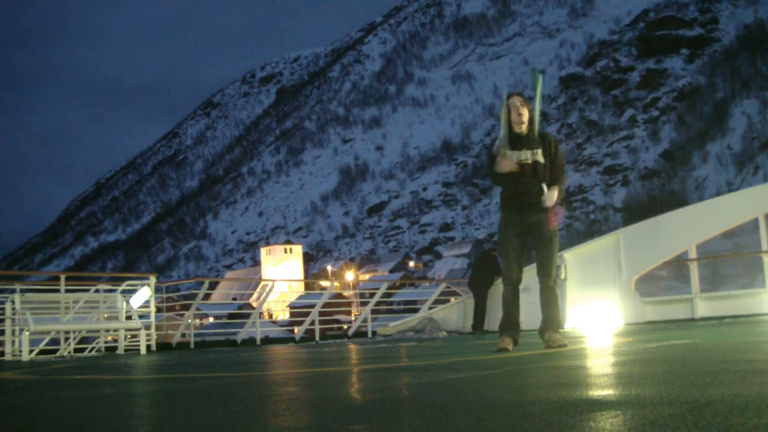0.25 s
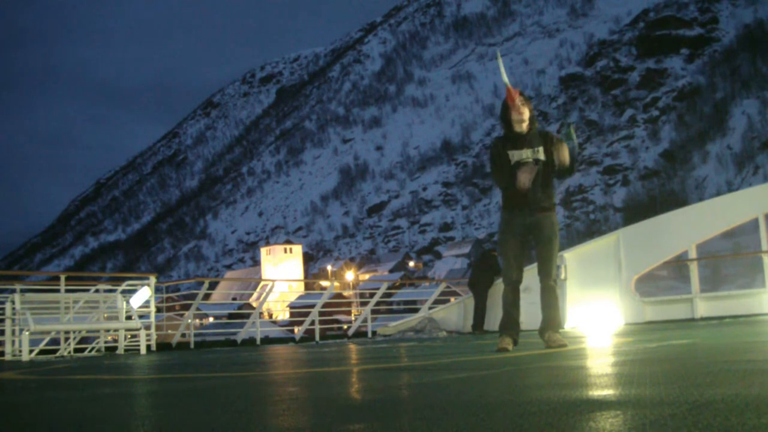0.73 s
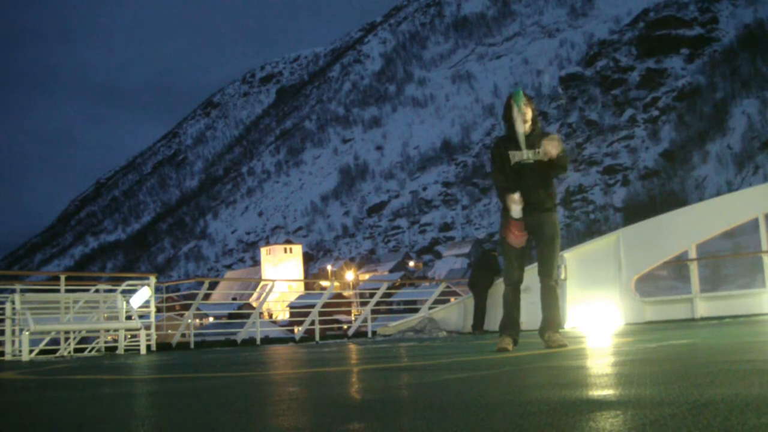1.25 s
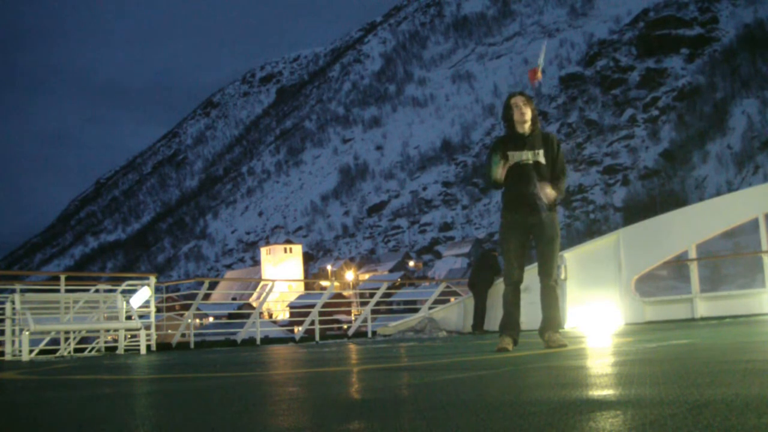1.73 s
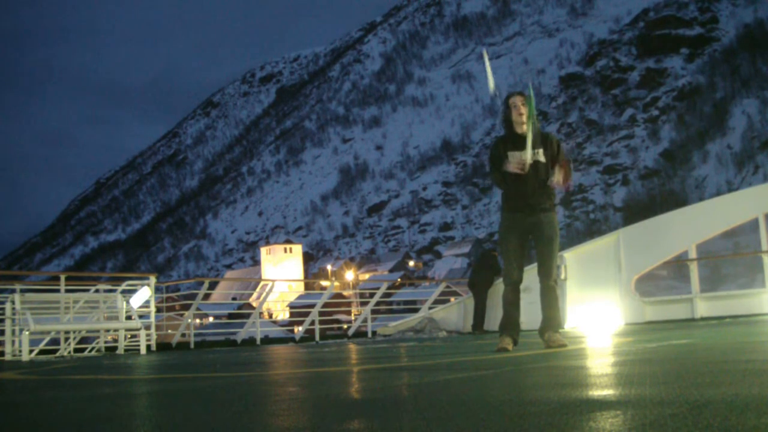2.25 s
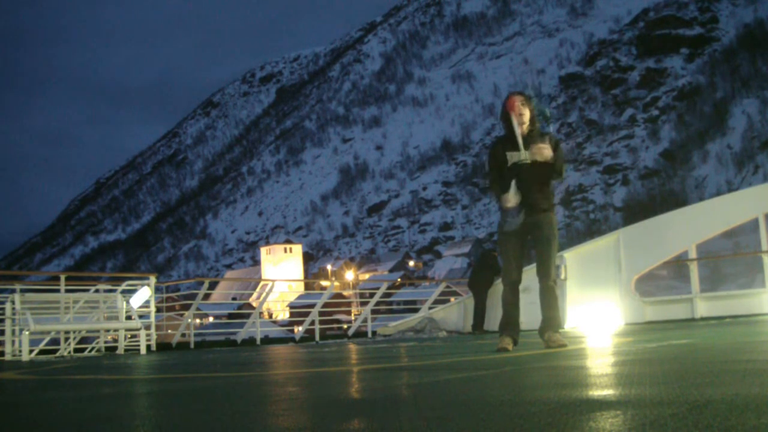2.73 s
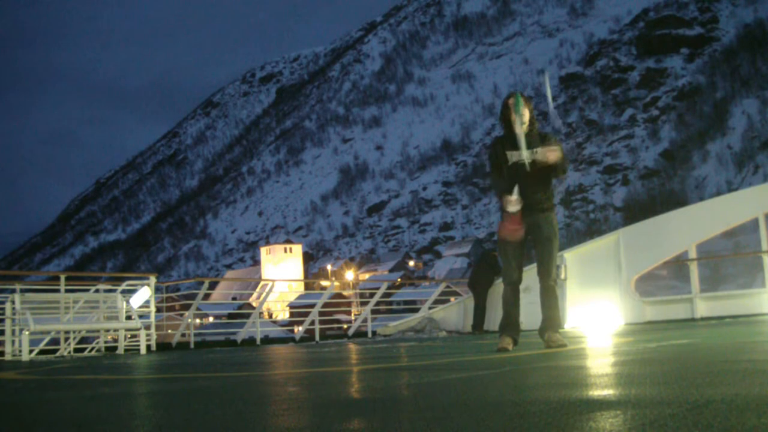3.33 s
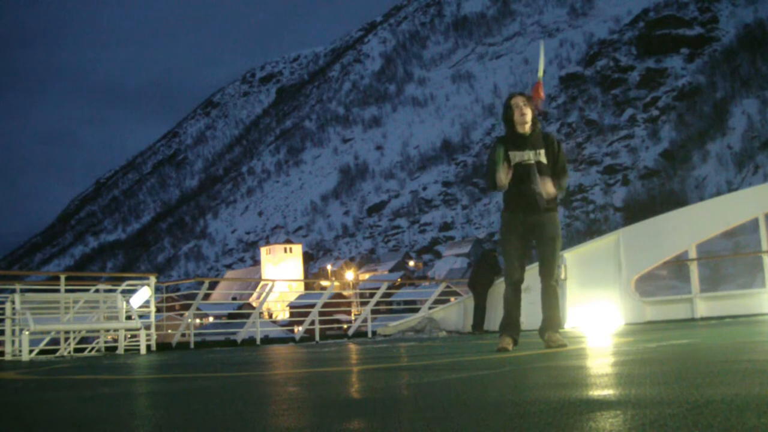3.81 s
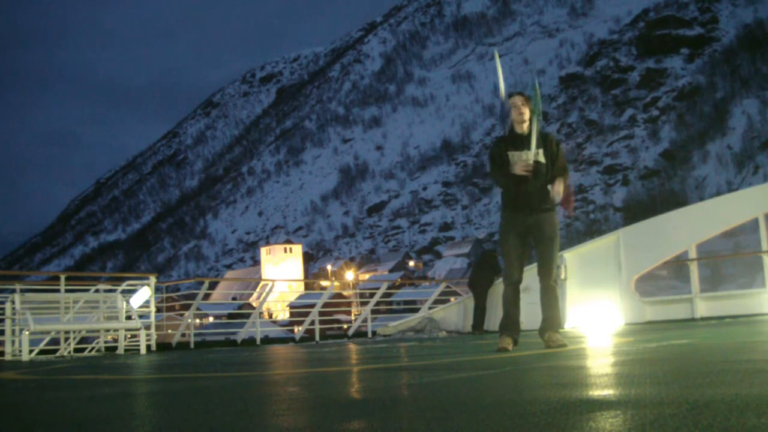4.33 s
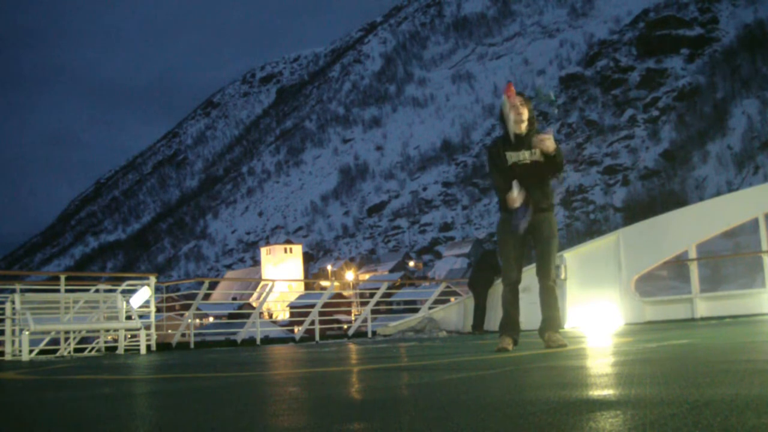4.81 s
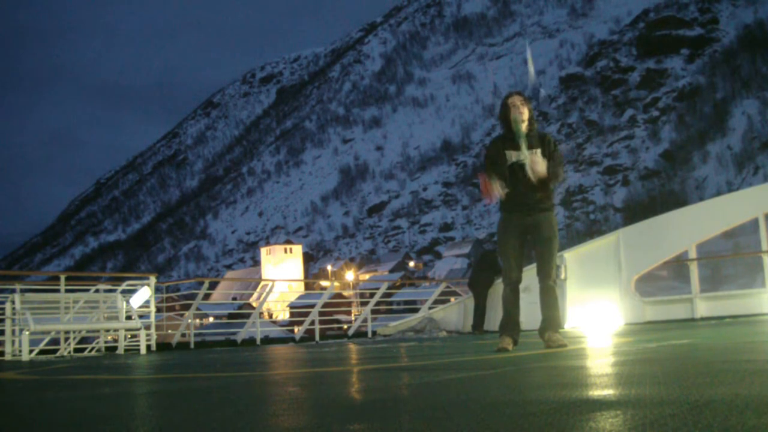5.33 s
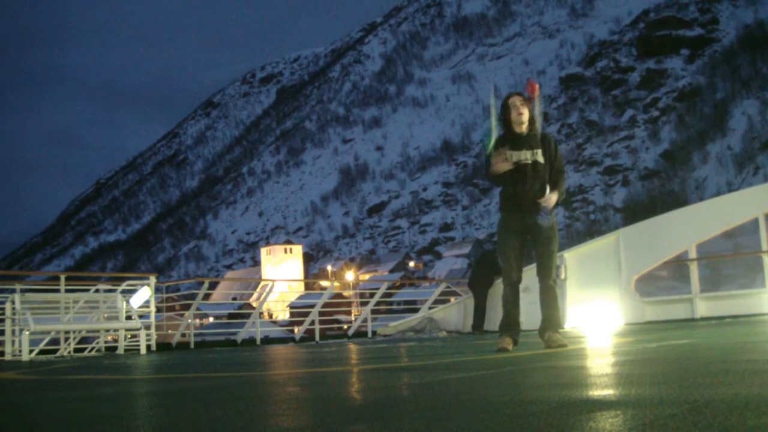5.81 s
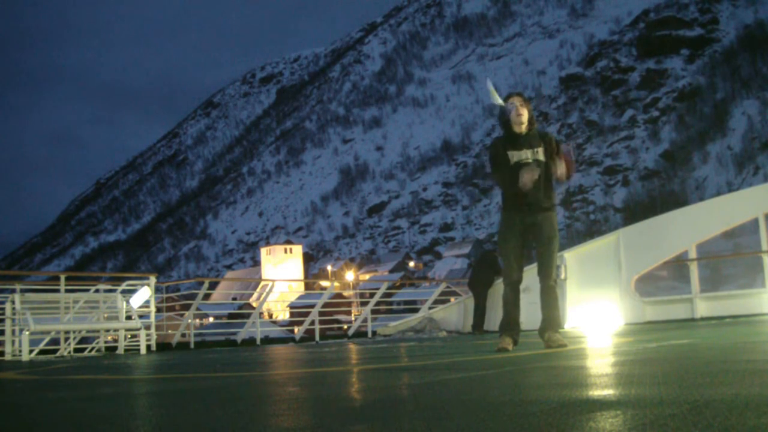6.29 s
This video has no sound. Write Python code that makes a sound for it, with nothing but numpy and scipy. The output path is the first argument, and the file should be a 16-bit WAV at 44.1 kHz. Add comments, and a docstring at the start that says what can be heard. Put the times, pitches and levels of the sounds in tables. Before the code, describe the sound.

Two ship engines drone low and throb steadily on an open deck while juggling clubs softly slap into hands, with two brief plastic clacks.

```python
"""On the open deck of a ship, two diesel engines drone at almost the same speed.
Each engine is a stack of exhaust notes, and the two stacks beat slowly against each other.
Filtered noise makes a low rumble, and a rushing roar with a hollow hum that throbs once per engine cycle.
In front, a juggler's clubs brush into the hands two or three times a second (soft bursts of noise).
Twice the clubs clack together: short knocks of noise with quickly fading rings."""
import sys
import numpy as np
from scipy import signal
from scipy.fft import rfft, irfft, next_fast_len
from scipy.io import wavfile
from scipy.ndimage import uniform_filter1d, map_coordinates

SR = 44100
rng = np.random.default_rng(int(sys.argv[2]) if len(sys.argv) > 2 else 0)


def waveform_to_disk(signal):
    """Save audio, clipped to [-1, 1], as 16-bit WAV at the path in sys.argv[1]."""
    frames = np.transpose(np.atleast_2d(signal))
    scaled = np.clip(frames, -1, 1) * 32767
    samples = np.round(scaled).astype(np.int16)
    wavfile.write(sys.argv[1], SR, samples)


N = 288855
TIME = np.arange(N) / SR  # seconds

# Rumble under the exhaust notes, relative colour: f/Hz, level/(dB per Hz)
RUMBLE_COLOUR = [(14, -8), (30, 3.5), (55, -4), (80, 5), (108, 1.5), (135, -4.5), (200, -22), (400, -57.5)]
# Colour of the roar, relative: f/Hz, level/(dB per Hz)
ROAR_COLOUR = [(130, -1.5), (175, -2.5), (230, -8), (310, -11.5), (450, -8.5), (650, -19.5), (900, -23),
               (1250, -27), (1850, -29), (2550, -29.5), (3500, -37.5), (4600, -38), (5500, -41.5),
               (6800, -42), (9000, -47.5), (15000, -54)]
# Hollow hum of the funnel: f/Hz, width/Hz (half that of each of two filters in a row),
# level/dB, share of the gas flow's swing (no unit)
FUNNEL_HUMS = [(164.5, 22.4, -39, 0.62), (211, 40, -49, 1.8), (289.8, 7.2, -43.5, 0.8),
               (304, 66, -46.5, 2.34), (410.8, 26.2, -35, 1.2), (447, 30.6, -39, 1), (631, 19.5, -47, 0.8),
               (869, 52, -50.5, 1.4)]
# How strongly the roar throbs with each engine cycle: t/s, depth/dB (up and down from the middle)
THROB_DEPTH_POINTS = [(0, 3), (.53, 3.5), (.71, 1), (1.42, 1.5), (2.66, 2.5), (3.36, 0.3), (3.54, 3),
                      (5.13, 0), (5.66, 3.5), (6.55, 2)]
# Heavy chuffs and short thumps of exhaust: t/s, extra roar level/dB,
# extra hum level/dB (before each hum's share), nominal half length/s
EXHAUST_CHUFFS = [(0.106, 5.5, 2, 0.038), (0.302, 3.6, 5.2, 0.03), (0.345, 7, 12, 0.0021),
                  (0.449, 5, 1, 0.0057), (0.486, 1, 1, 0.043), (0.505, 3.5, 5, .003),
                  (.65, 1.5, -2, 0.0049), (0.849, 2, 6, 0.0072), (1.181, 3, -5, .003),
                  (1.872, 2, -3, 0.013), (2.044, 3, -3, 0.0045), (2.095, 3.5, 4, 0.016),
                  (2.14, 3, 1, 0.0036), (2.197, 3, 6.5, 0.017), (2.394, 0, 5, .003), (2.983, 4.5, 6, 0.012),
                  (3.153, 3.2, 3, 0.018), (3.318, 1.5, 2, 0.017), (3.66, 2.5, 7, 0.022),
                  (3.688, 3.5, 8.5, 0.003), (4.006, 4, 4.5, 0.021), (4.035, 1.5, 1, .003),
                  (5.09, 2, 1, 0.047), (5.436, 2.5, 1, 0.033), (5.615, 2.5, 3, 0.016), (5.775, 2, 6, 0.018),
                  (6.136, 3.3, 2, 0.018)]
# Exhaust notes, relative levels: multiple of the cycle rate (no unit), port level/dB, starboard level/dB
EXHAUST_ORDERS = [(2, -69, -37), (3, -25, -27), (4, -47, -43), (5, -46, -35), (6, -26, -24), (7, -29, -36),
                  (8, -37, -33), (9, -32, -19), (10, -32, -33), (11, -29, -34), (12, -26, -37),
                  (13, -36, -30), (14, -23.5, -23), (15, -34, -43), (16, -39, -43), (17, -29, -40),
                  (18, -23, -41), (19, -38, -49), (20, -39, -49), (21, -31, -37), (22, -44, -57),
                  (24, -40, -40), (25, -44, -47), (26, -44, -50), (27, -45, -36), (28, -49, -44),
                  (29, -36, -35), (30, -42, -50), (32, -40, -49)]
# Slow beats between the engines: multiple of the cycle rate (no unit) -> t/s at which that note swells
BEAT_SWELLS = {3: 5.02, 6: 1.61, 7: .1, 9: .33, 11: 2.4, 12: 1.25, 13: 1.6, 14: .52, 17: 1.35, 18: 1.4, 21:
               1.6, 29: .6}
# Booms of the exhaust pipe: t/s, level/dB (rms, before the overall level of the notes)
PIPE_BOOMS = [(.142, -13.5), (.329, -15.5), (.516, -28), (.665, -18), (.85, -18.5), (1.024, -27),
              (1.118, -29), (1.372, -24.5), (1.578, -20), (1.747, -17.5), (1.87, -22.5), (2.022, -22),
              (2.266, -17), (2.431, -20.5), (2.611, -21), (2.803, -21.5), (2.983, -25), (3.145, -23),
              (3.312, -18.5), (3.401, -24), (3.494, -20), (3.643, -17), (3.982, -32), (4.367, -20.5),
              (4.719, -25), (4.959, -23), (5.287, -20), (5.426, -19), (5.602, -25), (5.763, -26),
              (5.938, -22), (6.142, -21.5), (6.306, -23), (6.488, -20.5)]
# Likeness of left and right: f/Hz, correlation (no unit)
STEREO_LIKENESS = [(100, 0.98), (500, 0.99), (1000, 0.96), (2000, 0.91), (4000, 0.74), (8000, 0.27),
                   (14000, 0.074)]
# Club handles landing in a hand: t/s, peak level/dB, length/s (from peak until power falls to 1/e)
HAND_CATCHES = [(.275, -39.5, 0.014), (.643, -37.5, 0.0066), (.993, -38, 0.0062), (1.13, -47, 0.0054),
                (1.595, -47, 0.0064), (1.70, -40, 0.0061), (2.085, -37.5, 0.0088), (2.41, -45, 0.014),
                (2.75, -38.5, 0.012), (3.11, -44, 0.0087), (3.82, -47, 0.013), (4.087, -40.5, 0.014),
                (4.85, -42.5, 0.012), (5.2, -42, 0.015), (5.49, -42.5, 0.0076), (5.905, -37, 0.0094)]
# Colour of a handle brushing a palm, relative: f/Hz, level/(dB per Hz)
BRUSH_COLOUR = [(1500, 20), (4000, 10.5), (6200, 14.5), (8000, 10), (10000, 10), (15000, 2)]
# Clubs knocking together: t/s, knock level/dB, contact length/s,
# strike on the body/dB, strike on the handle/dB
CLUB_CLACKS = [(1.3398, -26, .0005, -33, -27), (1.3418, -23, .0007, -26.5, -24),
               (1.3505, -37, .003, -39, -44), (3.7813, -19.3, .0005, -22.5, -30),
               (3.7865, -36, .0012, -42, -44)]
# Colour of the plastic knock, relative: f/Hz, level/(dB per Hz)
PLASTIC_COLOUR = [(700, 3), (3100, 4), (4500, -2), (6400, -3), (8200, -1), (14000, -4)]
# Rings of the hollow club body: f/Hz, level/dB (relative to the strike), time to fall 60 dB/s
BODY_MODES = [(1120, -7, .07), (1650, -12, .03), (2400, -2, .016), (2900, 0, .01), (3420, -8, .018),
              (4300, -9, .012)]
# Rings of the stiff club handle: f/Hz, level/dB (relative to the strike), time to fall 60 dB/s
HANDLE_MODES = [(6400, 0, .008), (7500, -5, .006), (9500, -5, .006)]
# Thin fizz that rides on the sound: f/Hz, level/dB (relative to the sound)
FIZZ_BANDS = [(4800, -48), (7200, -49), (9650, -52), (12050, -54.5), (14350, -57)]

PORT_HZ, STARBOARD_HZ = 5.666, 5.702  # average engine cycles per second (four-stroke)
FIRST_THROB_S = .136
SWELL_HZ, FIRST_SWELL_S, SWELL_DB = .59, .25, .53  # slow rise and fall of the gas flow
FLOW_DB, FLOW_SAG_DB_PER_S = .17, .11  # the flow's starting offset and its steady fall
SHUDDER_HZ, FIRST_SHUDDER_S, SHUDDER_DB = 10.93, .03, .97  # a quicker shake across the throb
CHUFF_RISE = 1.02  # a bell builds this much slower, and ends this much faster, than its half length
BOOM_HALF_S, PIPE_DB = .027, -30.5  # half length of a boom; level of the upper notes between booms
CUTOFF_HZ = 14850


def from_db(db):
    """Turn decibels into a gain."""
    return 10 ** (np.asarray(db) / 20)


def rms_one(x):
    """Scale a sound to an average power of 1."""
    return x / np.sqrt(np.mean(x ** 2) + 1e-20)


def at_hz(points, hz):
    """Read a table between its points, with pitch on a log scale."""
    known_hz, values = np.transpose(points)
    return np.interp(np.log(hz + 1), np.log(known_hz), values)


def drift(rate):
    """Smooth random wandering with spread of about 1, through `rate` random points a second."""
    points = rng.standard_normal(2048)
    position = TIME[::64] * rate + 10
    return map_coordinates(points, [position], order=3, mode="mirror").repeat(64)[:N]


def wave(hz, crest_s):
    """A steady rise and fall of height 1 with a crest at the given time."""
    return np.cos(2 * np.pi * hz * (TIME - crest_s))


def chuff(s, half_s):
    """A bell of height 1 that builds a little slower than it ends."""
    width = half_s * np.where(TIME < s, CHUFF_RISE, 1 / CHUFF_RISE)
    return np.exp(-np.minimum(((TIME - s) / width) ** 2, 50))


def steadied(x, share, window_s=.018):
    """Even out a share of a sound's own slow swells, then scale it to rms 1."""
    power = np.mean(np.atleast_2d(x) ** 2, axis=0)
    size = int(window_s * SR)
    for _ in range(2):
        power = uniform_filter1d(power, size)
    return rms_one(x / (np.abs(power) + 1e-6) ** (share / 2))


def resonate(x, hz, width_hz):
    """One resonance lets through sound near its own pitch, with gain 1 at the top."""
    r = np.exp(-np.pi * width_hz / SR)
    top = np.array([1, 0, -1]) * (1 - r * r) / 2
    return signal.lfilter(top, [1, -2 * r * np.cos(2 * np.pi * hz / SR), r * r], x)


def resonate_twice(x, hz, width_hz):
    """Two equal resonances in a row give a band with steeper sides."""
    return resonate(resonate(x, hz, width_hz), hz, width_hz)


def stereo_noise(colour):
    """Coloured noise of rms 1, alike in both ears in the bass and wider in the treble."""
    size = next_fast_len(N)
    hz = np.arange(size // 2 + 1) * SR / size
    mid, side = rfft(rng.standard_normal((2, size)))
    alike = np.clip(at_hz(STEREO_LIKENESS, hz), 0, 1)
    both = np.sqrt(1 + alike) * mid + np.sqrt(1 - alike) * side * [[1], [-1]]
    low_edge = 1 - np.exp(-(hz / colour[0][0]) ** 4)  # fades out below the first point
    shaped = both * low_edge * from_db(at_hz(colour, hz))
    return rms_one(irfft(shaped, size)[:, :N])


def low_rumble(level_db=-24.0):
    """Low-pitched noise lies under the exhaust notes."""
    return from_db(level_db) * stereo_noise(RUMBLE_COLOUR)


def surge():
    """The gas flow swells, throbs, shudders and chuffs: level changes in dB for the roar and the hum."""
    swell = FLOW_DB - FLOW_SAG_DB_PER_S * TIME + SWELL_DB * wave(SWELL_HZ, FIRST_SWELL_S)
    depth_db = np.interp(TIME, *np.transpose(THROB_DEPTH_POINTS))
    throb = depth_db * wave((PORT_HZ + STARBOARD_HZ) / 2, FIRST_THROB_S)
    shudder = SHUDDER_DB * wave(SHUDDER_HZ, FIRST_SHUDDER_S)
    chuffs = sum(np.outer([roar_db, hum_db], chuff(s, half_s))
                 for s, roar_db, hum_db, half_s in EXHAUST_CHUFFS)
    return swell + throb + shudder + chuffs


def funnel_hum(surge_db, steadiness=.58):
    """Gas noise stirs the funnel's resonances, which follow the surges by different shares."""
    stir = stereo_noise([(100, 0), (1200, 0)])
    hum = 0
    for hz, width_hz, db, swing in FUNNEL_HUMS:
        band = steadied(resonate_twice(stir, hz, 2 * width_hz), steadiness)
        hum = hum + from_db(db + swing * surge_db) * band
    return hum


def exhaust_roar(notes, roar_db=-26.5, puff_db=1.62, flutter_db=1.1, settle_s=.066):
    """Turbulent gas surges once per cycle, puffs on the pressure swings and rings in the funnel."""
    roar_surge_db, hum_surge_db = surge()
    grain_db = puff_db * np.abs(rms_one(notes)) + flutter_db * drift(60)
    # taking away the moving average lets puffs roughen the flow without swelling it
    grain_db = grain_db - uniform_filter1d(grain_db, int(settle_s * SR))
    gas = from_db(roar_db + roar_surge_db) * stereo_noise(ROAR_COLOUR)
    return from_db(grain_db) * (gas + funnel_hum(hum_surge_db))


def pipe_booms():
    """The pipe booms about once per cycle: powers of booms and resting level add up."""
    power = from_db(PIPE_DB) ** 2
    for s, db in PIPE_BOOMS:
        power = power + (from_db(db) * chuff(s, BOOM_HALF_S)) ** 2
    return np.sqrt(power)


def exhaust_notes(level_db=.42, waver_db=.43, wander_s=.00017, boom_above_hz=135):
    """Engines sound multiples of their cycle rates; each pair beats, and the upper notes boom."""
    deep, upper = np.zeros((2, N))
    clock = TIME + wander_s * drift(1.53)  # the governors hunt a little
    for order, port_db, starboard_db in EXHAUST_ORDERS:
        start, chance = rng.random(2)
        port_turns = start + order * PORT_HZ * clock
        beat_hz = order * (STARBOARD_HZ - PORT_HZ)
        swell_s = BEAT_SWELLS.get(round(order), chance / beat_hz)  # random if not listed
        starboard_turns = port_turns + beat_hz * (TIME - swell_s)
        port = from_db(port_db) * np.sin(2 * np.pi * port_turns)
        starboard = from_db(starboard_db) * np.sin(2 * np.pi * starboard_turns)
        note = np.sqrt(2) * (port + starboard) * from_db(waver_db * drift(3.12))
        if order * PORT_HZ > boom_above_hz:
            upper += note
        else:
            deep += note
    even_deep = np.std(deep) * steadied(deep, .47, window_s=.047)
    booming = pipe_booms() * steadied(upper, .75, window_s=.016)
    return from_db(level_db) * (even_deep + booming)


def touches(rows, tail_db, tail_t60):
    """Loudness curve of contacts: a rounded burst, then a short dying tail."""
    power = np.zeros(N)
    for s, db, length in rows:
        age = TIME - s
        burst = np.exp(-np.minimum((age / length) ** 2, 50))
        tail = (age > 0) * from_db(tail_db - 60 * np.clip(age / tail_t60, 0, 2))
        power += from_db(db) ** 2 * (burst + tail ** 2)
    return np.sqrt(power)


def club_catches():
    """Handles slide softly into the palms: short bursts of brushing noise."""
    return touches(HAND_CATCHES, tail_db=-20, tail_t60=.1) * stereo_noise(BRUSH_COLOUR)


def club_ring(times, strength_db, modes):
    """Each knock sets short-lived rings going at once."""
    clicks, out = np.full(N, 1e-18), 0  # the tiny floor keeps the filters from slowing down
    clicks[(times * SR).astype(int)] = from_db(strength_db)
    for hz, db, t60 in modes:
        r = from_db(-60 / (t60 * SR))
        w = 2 * np.pi * hz / SR
        ring = signal.lfilter([0, np.sin(w)], [1, -2 * r * np.cos(w), r * r], clicks)
        out = out + from_db(db) * ring
    return out


def club_clacks():
    """Hollow plastic clubs knock together, and their bodies and handles ring briefly."""
    s, db, length, body_db, handle_db = np.transpose(CLUB_CLACKS)
    knock = stereo_noise(PLASTIC_COLOUR) * touches(zip(s, db, length), tail_db=-14, tail_t60=.02)
    return knock + club_ring(s, body_db, BODY_MODES) + club_ring(s, handle_db, HANDLE_MODES)


def scene(left_db=-.26):
    """Engines and juggler on the open deck, with no room around them."""
    notes = exhaust_notes()
    ship = low_rumble() + exhaust_roar(notes) + notes
    balance = from_db([[left_db / 2], [-left_db / 2]])  # the ship is slightly louder on the right
    return ship * balance + club_catches() + club_clacks()


def record(dry, fizz_width_hz=480):
    """Round the highest peaks, let faint bands of high fizz follow the waveform, cut the top."""
    rounded = dry / (1 + dry ** 8) ** (1 / 8)
    white = rng.standard_normal(N)
    fizz = sum(from_db(db) * rms_one(resonate_twice(white, hz, fizz_width_hz)) for hz, db in FIZZ_BANDS)
    low_pass = signal.ellip(10, .1, 90, CUTOFF_HZ, fs=SR, output="sos")
    return signal.sosfilt(low_pass, rounded * (1 + fizz))


dry = scene()
out = record(dry)
waveform_to_disk(out)
```